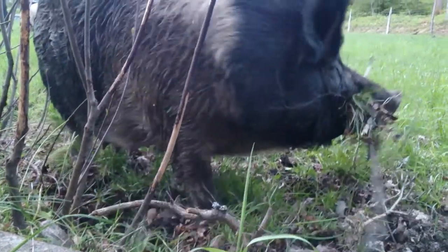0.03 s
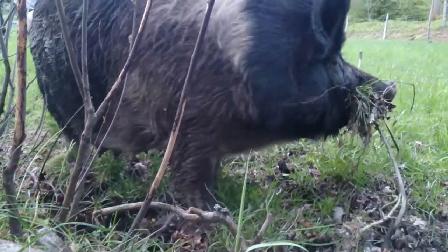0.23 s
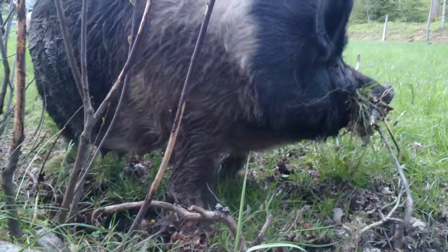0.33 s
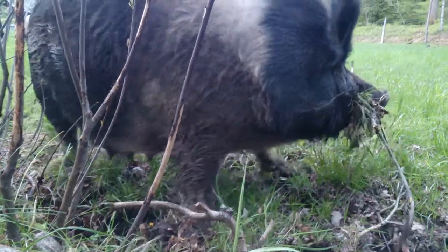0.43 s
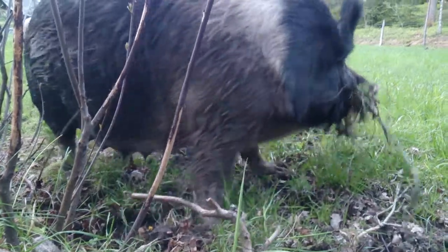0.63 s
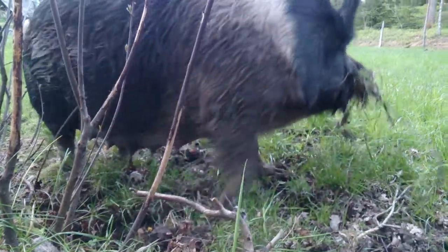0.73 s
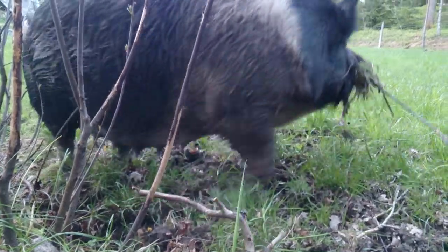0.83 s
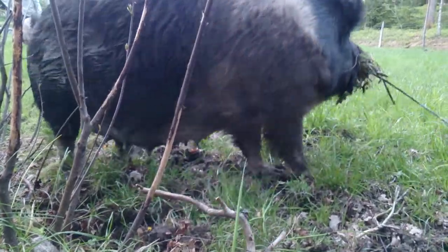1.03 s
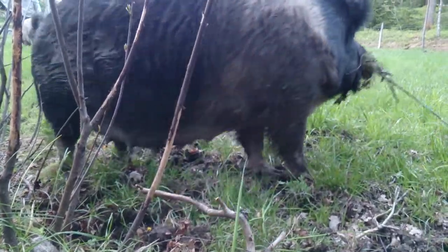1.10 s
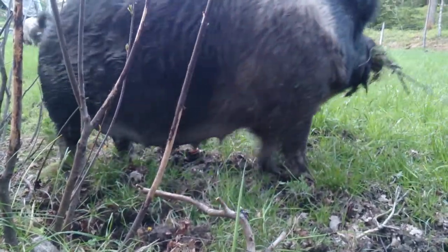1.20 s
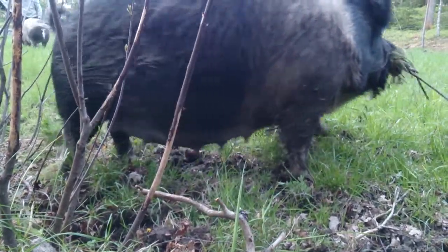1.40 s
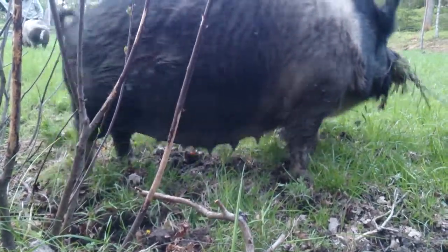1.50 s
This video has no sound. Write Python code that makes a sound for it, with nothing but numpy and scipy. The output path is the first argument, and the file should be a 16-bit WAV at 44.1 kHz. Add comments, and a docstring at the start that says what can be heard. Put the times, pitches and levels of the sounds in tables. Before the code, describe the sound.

A pig tears up grass close by in a quiet field, ripping and crackling for the first 0.2 seconds. A woody stem snaps sharply at 0.25 seconds, the loudest moment, and smaller twigs crack around 0.35. One short, low grunt comes near 0.6 seconds, then a soft, fluttering blow through the snout until 0.9. Faint crackles, dull hoof thuds on turf and small lip smacks continue to about 1.5 seconds.

```python
"""A pig tearing up grass

Close by in a quiet field, a pig tears up a mouthful of grass and twigs. Tiny fibres break,
a woody stem snaps and the litter crackles. A few pulses ring its throat in one short grunt,
then it blows out through its snout and walks on, lips smacking on the bundle.
Its hooves thud softly on the turf."""
import sys
import numpy as np
from scipy import signal
from scipy.fft import rfft, irfft, next_fast_len
from scipy.io import wavfile
from scipy.ndimage import map_coordinates

SR = 44100
rng = np.random.default_rng(int(sys.argv[2]) if len(sys.argv) > 2 else 0)


def transcribe(u):
    """Save the signal u as a 16-bit wav file named by the first command-line argument.

    u: samples, shape (n,) or (channels, n), limited to [-1, 1]; the rate is SR.
    q: integer samples, one column per channel.
    """
    v = np.clip(np.atleast_2d(u).T, -1, 1)
    q = np.round(v * 32767).astype(np.int16)
    wavfile.write(sys.argv[1], SR, q)


N = 68355
TIME = np.arange(N) / SR
EVENT_SIZE = 2 ** 13  # samples in one short sound


def amp(db):
    """Turn decibels into a gain."""
    return 10 ** (np.asarray(db) / 20)


def unit(x):
    """Scale x to an average (rms) level of 1."""
    return x / np.sqrt(np.mean(x ** 2) + 1e-20)


def along(points, hz):
    """Read between (Hz, value) points on a log frequency axis."""
    freqs, values = np.transpose(points)
    return np.interp(np.log(hz + 1), np.log(freqs + 1), values)


def level(rows):
    """Join (seconds, dB) rows into a gain for every sample."""
    return amp(np.interp(TIME, *np.transpose(rows)))


def pan(db):
    """Left and right gains for a balance in dB; above zero is to the left."""
    gains = amp(np.array([[.5], [-.5]]) * db)
    return gains / np.sqrt(np.mean(gains ** 2, axis=0))


def filtered(x, response):
    """Multiply each frequency in x by response(hz)."""
    size = x.shape[-1]
    padded = next_fast_len(size + size // 16, True)
    hz = np.fft.rfftfreq(padded, 1 / SR)
    return irfft(rfft(x, padded) * response(hz), padded)[..., :size]


def noise(size=N):
    """Two unrelated white noises."""
    return rng.standard_normal((2, size))


def wobble(rate):
    """A smooth random curve through `rate` points a second."""
    points = rng.standard_normal(int(N * rate / SR) + 4)
    return map_coordinates(points, [TIME * rate])


def fade(start, attack, t60, size=N):
    """Rise, then die away; the fade time t60 is the seconds it takes to drop 60 dB."""
    t = np.maximum(np.arange(size) / SR - start, 0)
    return (1 - np.exp(-t / attack)) * np.exp(-np.log(1000) * t / t60)


def burst(x, attack, t60):
    """Give a short noise a rise and fade, and the energy of that shape."""
    shape = fade(0, attack, t60, size=EVENT_SIZE)
    return unit(x * shape) * np.sqrt(np.mean(shape ** 2))


def add(out, start, x):
    """Mix x into out, from `start` seconds on."""
    part = out[:, max(round(start * SR), 0):][:, :x.shape[-1]]
    part += x[:, :part.shape[-1]]


# How alike left and right sound. Each row: frequency in Hz, likeness from 0 to 1.
LIKENESS = [(100, 0.48), (400, 0.64), (1000, 0.35), (3000, 0.083), (12000, 0.2)]

def coloured(pair, tone, balance=((1000, 0),)):
    """Turn two noises into stereo with a tone and a balance, both given as (Hz, dB) rows."""
    def blend(hz):
        angle = np.arccos(np.clip(along(LIKENESS, hz), -1, 1)) / 2
        return amp(along(tone, hz)) * [np.cos(angle), np.sin(angle)]
    mid, side = filtered(pair, blend)
    stereo = np.array([mid + side, mid - side])
    return unit(filtered(stereo, lambda hz: pan(along(balance, hz))))


def fibres(per_second=9000, spread_db=2, clumps_per_s=260, clump_db=1):
    """Many tiny fibres break, in uneven sizes and in clumps."""
    breaking = rng.random(N) < per_second / SR
    sizes = amp(spread_db * np.clip(rng.standard_normal(N), -2, 2))
    crackle = unit(breaking * sizes * noise()) + .5 * noise()
    return crackle * amp(clump_db * wobble(clumps_per_s))


# How loud the tearing and the dragging are. Each row: time in seconds, level in dB.
TEAR_LEVEL = [(0.0, -42.5), (0.01, -49.5), (0.018, -41), (0.064, -34.5), (0.076, -43.5), (0.116, -39.5),
              (0.152, -44.5), (0.222, -70), (0.235, -62.5)]
DRAG_LEVEL = [(.24, -91.5), (.25, -49), (.3, -68.5), (.335, -63.5), (.385, -47), (.42, -49.5), (.45, -62.5),
              (.51, -57.5), (.545, -54), (.58, -49.5), (.62, -59), (.68, -69), (.9, -75)]
# The tone of the grass and of the litter. Each row: frequency in Hz, level in dB.
GRASS_TONE = [(150, -18.5), (300, -21), (500, -20.5), (1200, -8), (1700, -5), (3200, -4), (5400, -4),
              (6500, -9), (7400, -18.5), (8600, -8.5), (11000, -2), (13000, -5), (15800, 0.5)]
LITTER_TONE = [(300, -16), (1500, -1.5), (3000, -1), (5200, -4.5), (7000, -19.5), (9500, -6), (11500, 1),
               (13500, -3.5), (15800, 1.5)]
# The microphone's left-right colouring of the tearing and cracking sounds.
# Each row: frequency in Hz, balance in dB.
MIC_ON_TEAR = [(300, 11), (1200, 5), (2400, 16), (4400, 11.5), (8000, 4), (11500, -1), (15000, 13.5)]
MIC_ON_CRACK = [(300, -3), (1200, 1.5), (2400, 11), (4400, 5.5), (8000, 1), (11500, -5.5), (15000, 12.5)]

def grass():
    """Blades tear until the stem snaps, then the freed stems drag through the litter."""
    pull = level(TEAR_LEVEL) * (TIME < SNAP_S)
    tearing = amp(5) * pull * coloured(fibres(), GRASS_TONE, MIC_ON_TEAR)
    dragging = level(DRAG_LEVEL) * pan(1) * coloured(fibres(), LITTER_TONE, MIC_ON_CRACK)
    return tearing + dragging


# Single cracks. Each row: start in seconds, level in dB, rise and fade times in seconds,
# middle and treble strength in dB, treble centre in Hz, balance in dB.
TWIG_CRACKS = [(.008, -19.5, 0.0011, 0.023, -10.5, 15, 14600, 4),
               (.05, -28.5, 0.0012, .025, -3, -15, 11500, -3.5),
               (0.0606, -27.5, .0005, .03, 3, -0.5, 9700, 5),
               (0.3408, -17, 0.00022, 0.004, -7, 24, 13600, -3),
               (0.351, -39, 0.00046, 0.054, 7, 11, 13500, -5),
               (0.354, -24, .0008, 0.031, 0.5, 12.5, 13300, 4.5),
               (.3755, -30, 0.00026, 0.019, -14, 23, 12700, -11),
               (0.5576, -25.5, 0.00039, 0.021, 10.5, 4.5, 13100, 1.5),
               (0.5709, -28.5, 0.00035, 0.026, 5.5, 8.5, 13000, -8),
               (0.9526, -32, .0002, 0.0037, -36, 19.5, 15460, 13),
               (0.953, -55.5, 0.0011, 0.24, 22, 30, 14740, 11),
               (1.0244, -45.5, 0.0017, 0.041, 22.5, 25, 14940, 4),
               (1.1149, -40.5, 0.00018, 0.011, -5, 10, 10850, 26),
               (1.129, -40, .008, 0.078, 7.5, 8, 11780, 2.5)]

def twig_cracks():
    """Twigs and blades give way, each in a burst of noise with its own tone."""
    out = np.zeros((2, N))
    for start, db, attack, t60, middle_db, treble_db, treble_hz, balance in TWIG_CRACKS:
        body = [(200, middle_db - 16.5), (1700, middle_db), (5000, 0), (7300, -11)]
        treble = [(treble_hz * ratio, treble_db - drop) for ratio, drop in [(.55, 16), (1, 0), (1.7, 6)]]
        crack = coloured(noise(EVENT_SIZE), body + treble, MIC_ON_CRACK)
        add(out, start, amp(db) * pan(balance) * burst(crack, attack, t60))
    return out


# A faint murmur while tugging, then the grunt.
# Each row: start in seconds, relative level in dB, brightness in dB.
THROAT_PULSES = [(0.0098, -15, -34), (0.0328, -13, -33.5), (0.0615, -14, -32.5), (0.5534, -3.5, -9),
                 (0.5846, 1, 3), (0.6176, 3.5, -12), (0.6233, -2, -1.5), (0.6304, -21, 10)]
# How the throat and snout ring. Each row: frequency in Hz, level in dB, fade time in seconds.
THROAT_RINGS = [(60.3, -31, .09), (134.5, -18, 0.1), (243.5, -22, 0.098), (418.5, -33, 0.097),
                (530, -70, 0.033), (991, -26, 0.05), (1344, -27.5, 0.028), (1367, -33.5, 0.083),
                (1721, -25, 0.032), (1924, -26.5, 0.033)]

def grunt(swell_db=-30, swell_s=.0015, cutoff_hz=1900):
    """Slack pulses, each a swell of pressure and a puff of air, ring the throat and snout."""
    out = np.zeros((2, N))
    t = TIME[:EVENT_SIZE]
    puff_tone = [(100, -4), (330, 5.5), (500, 1.5), (680, -32),
                 (1000, -5.5), (2000, -.5), (2400, -32), (6000, -49)]
    for start, db, bright_db in THROAT_PULSES:
        swell = np.exp(-.5 * ((TIME - start) / swell_s) ** 2)
        out += amp(db + swell_db) * swell
        for hz, ring_db, t60 in THROAT_RINGS:
            # Brightness changes the high rings most.
            tilt_db = bright_db * along([(170, .19), (250, .47), (550, .71), (1000, 1)], hz)
            balance = along([(200, .5), (1000, 2.2), (2000, 20)], hz)
            ring = np.sin(2 * np.pi * hz * t) * fade(0, .0013, t60, size=EVENT_SIZE)
            add(out, start, amp(db + ring_db + tilt_db) * pan(balance) * ring)
        puff = coloured(noise(EVENT_SIZE), puff_tone, balance=[(200, -2), (2000, 2)])
        add(out, start, amp(db + bright_db - 32) * burst(puff, attack=.0005, t60=.061))
    return signal.sosfilt(signal.butter(8, cutoff_hz, fs=SR, output="sos"), out)


# Hooves landing. Each row: start in seconds, relative level in dB, fade time in seconds.
HOOF_STEPS = [(.012, -42.5, .15), (.125, -47.5, 0.064), (0.154, -39.5, .09), (0.246, -51, 0.22),
              (0.343, -59.5, 0.57), (0.399, -55.5, 0.13), (0.49, -48, 0.26), (0.759, -58.5, 0.32),
              (1.035, -63, 0.27), (1.106, -54.5, 0.31), (1.37, -59.5, .1), (1.408, -61.5, 0.47),
              (1.527, -62, 0.13)]
# The dull tone of the turf. Each row: frequency in Hz, level in dB.
TURF_TONE = [(25, -7.5), (60, -11.5), (100, 0.5), (135, 0), (175, -3.5), (230, -21.5), (320, -14),
             (600, -43), (1500, -50)]

def hooves(attack=.0023):
    """The heavy body thuds on soft ground."""
    weight = sum(amp(db + 5.5) * fade(start, attack, t60) for start, db, t60 in HOOF_STEPS)
    return weight * coloured(noise(), TURF_TONE, balance=[(100, 1.5)])


# Smacks on the bundle. Each row: start in seconds, relative level in dB, fade time in seconds,
# centre in Hz, band width as a multiple of the centre, balance in dB.
LIP_SMACKS = [(0.1531, -29.5, 0.03, 1482, 0.87, 10), (.158, -37, 0.038, 665, 0.43, 2),
              (0.2372, -30.5, 0.0073, 1800, 0.51, 9.5), (0.4011, -41, 0.052, 1620, 1.13, 7),
              (0.406, -41.5, 0.033, 3200, 0.54, 26), (0.627, -42, 0.013, 3420, 0.15, 11),
              (.687, -58, 0.047, 2520, .4, 16), (1.089, -58, 0.04, 537, 0.87, 3),
              (1.315, -50.5, 0.017, 2227, 0.3, 7), (1.366, -41, 0.025, 1076, 0.36, 3.5),
              (1.3665, -55, 0.029, 3040, 2, 5), (1.377, -50.5, 0.029, 586, 1.4, 3),
              (1.395, -54, 0.037, 1061, 0.3, 7)]
# The tone of the hollow mouth. Each row: frequency in Hz, level in dB.
MOUTH_TONE = [(400, 1.5), (700, -1), (980, 11), (1200, -7.5), (1520, 8.5), (2000, -7.5), (2450, 3.5),
              (3100, -7.5), (3900, 2.5), (5000, -2.5)]

def lip_smacks(attack=.0029):
    """Lips and tongue part and sound the hollow of the mouth."""
    out = np.zeros((2, N))
    for start, db, t60, hz, width, balance in LIP_SMACKS:
        band_pass = lambda f: (1j * f * hz / (hz * hz - f * f + 1j * f * hz * width)) ** 2
        smack = filtered(coloured(noise(EVENT_SIZE), MOUTH_TONE), band_pass)
        add(out, start, amp(db + 6) * pan(balance) * burst(smack, attack, t60))
    return out


# The quick breaks of one snap. Each row: start in seconds, level in dB, balance in dB.
STEM_BREAKS = [(0.2431, -29, 3), (0.2433, -4.5, -7), (.245, -10, 1), (0.2445, -10.5, 6), (0.2476, -13.5, 7)]
SNAP_S = STEM_BREAKS[0][0]
# Brief rings at the snap: the stem's lower tones and a bright microphone ring near 11.5 kHz.
# Each row: frequency in Hz, level in dB, fade time in seconds.
SNAP_RINGS = [(329.5, -22, 0.0077), (882, -25, .01), (2332, -26.5, 0.037), (3923, -27, 0.022),
              (5156, -25.5, 0.057), (11715, -0.5, 0.011), (11560, -20, 0.0067)]
# The tone of the breaks and of the splinters. Each row: frequency in Hz, level in dB.
STEM_TONE = [(100, -13), (400, -10), (1000, -11.5), (2300, -6), (3100, -7), (4000, -1.5), (5200, -2.5),
             (6500, -11.5), (8500, -1.5), (11500, 5.5), (13500, 3.5), (15800, 3)]
SPLINTER_TONE = [(300, -30.5), (1500, -26), (4000, -22.5), (5200, -12.5), (7000, -15.5), (9500, -1.5),
                 (11500, 5), (13500, -4.5), (15800, -8.5)]

def stem_snap():
    """The woody stem breaks in stages and splinters; the snap rings both stem and microphone."""
    breaks = sum(amp(db) * pan(balance) * fade(start, attack=.0001, t60=.012)
                 for start, db, balance in STEM_BREAKS)
    out = breaks * coloured(noise(), STEM_TONE, MIC_ON_CRACK)
    for hz, db, t60 in SNAP_RINGS:
        ring = np.sin(2 * np.pi * hz * (TIME - SNAP_S)) * fade(SNAP_S, .0004, t60)
        out += amp(db) * pan(along(MIC_ON_CRACK, hz) - 3) * ring
    splinters = coloured(fibres(), SPLINTER_TONE, MIC_ON_CRACK)
    return out + amp(-24) * fade(SNAP_S, attack=.00067, t60=.26) * splinters


# How loud the breath is. Each row: time in seconds, level in dB.
BLOW_LEVEL = [(.6, -76), (.645, -51), (.73, -46), (.82, -53.5), (.885, -58), (.915, -68.5), (.98, -84.5)]
# The tone of the snout. Each row: frequency in Hz, level in dB.
SNOUT_TONE = [(200, -11), (360, -12.5), (440, 4), (530, 1), (630, -13), (1100, -13), (1480, -7), (1590, 0),
              (1720, -11), (1850, -18), (2000, -12), (2130, -10), (2260, -29), (4000, -45.5)]

def snout_blow(flutter_per_s=29, flutter_db=3.5):
    """The pig lets the rest of its air out through the fluttering snout."""
    flutter = amp(flutter_db * wobble(flutter_per_s))
    breath = coloured(noise(), SNOUT_TONE, balance=[(400, .89), (2000, 4.8)])
    return level(BLOW_LEVEL) * flutter * breath


def field_echo(x, echo_db=-17, t60=.17):
    """Add the faint sound that scatters back from the ground and bushes."""
    t = np.arange(SR // 3) / SR
    tail = noise(len(t)) * np.exp(-np.log(1000) * t / t60) * (t > .003)
    echo = signal.fftconvolve(x, tail / np.linalg.norm(tail[0]), axes=1)[:, :N]
    return x + amp(echo_db) * echo


# The tone of the air behind everything. Each row: frequency in Hz, level in dB.
AIR_TONE = [(25, 2.5), (70, -8), (130, -8), (200, -17.5), (300, -22.5), (600, -22.5), (1300, -25.5),
            (2500, -30), (5200, -27), (7500, -34.5), (11500, -32), (15800, -33)]

def still_air():
    """The faint, steady rumble and hiss of the quiet field."""
    return amp(-63.5) * coloured(noise(), AIR_TONE, balance=[(200, 1.5), (2000, 0)])


def scene(left_lead_s=.00007):
    """The pig in the still air of the field; its sound arrives on the left first."""
    pig = grass() + twig_cracks() + grunt() + hooves() + lip_smacks() + stem_snap() + snout_blow()
    early_s = left_lead_s * np.array([[.5], [-.5]])
    pig = filtered(pig, lambda hz: np.exp(2j * np.pi * hz * early_s))
    return field_echo(pig) + still_air()


def record(dry, low_cut_hz=42, top_hz=16000):
    """Thin the deepest bass, clip at full scale and cut off the highest treble."""
    thinned = signal.sosfilt(signal.butter(2, low_cut_hz, "high", fs=SR, output="sos"), dry)
    clipped = np.clip(thinned, -1, 1)
    return filtered(clipped, lambda hz: np.clip((top_hz - hz) / 400 + .5, 0, 1))


dry = scene()
out = record(dry)
transcribe(out)
```